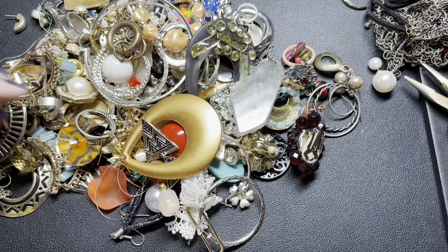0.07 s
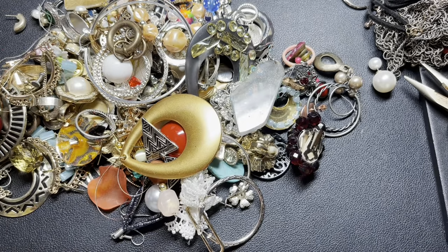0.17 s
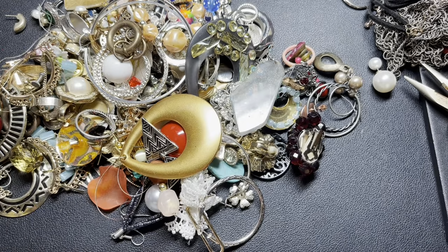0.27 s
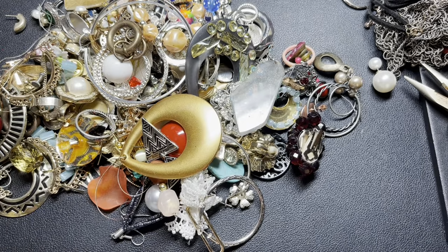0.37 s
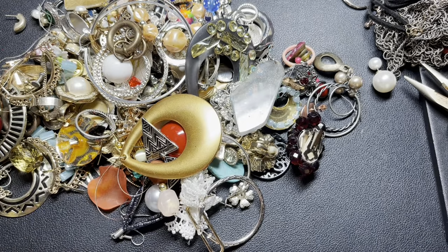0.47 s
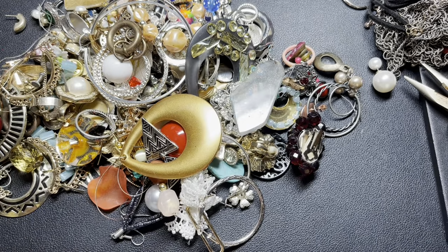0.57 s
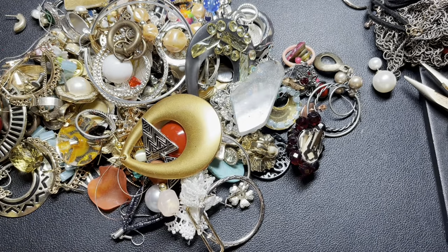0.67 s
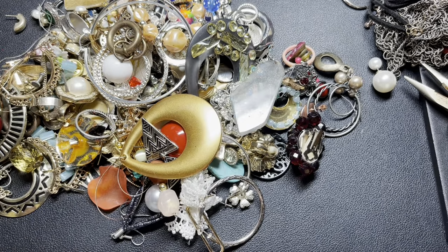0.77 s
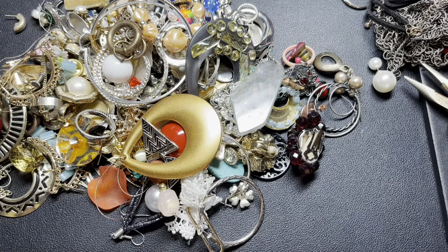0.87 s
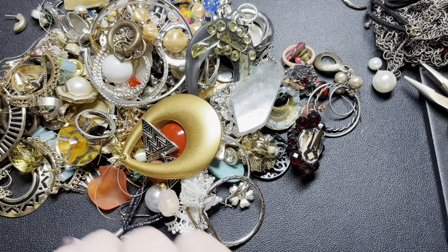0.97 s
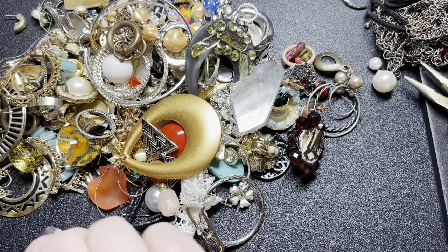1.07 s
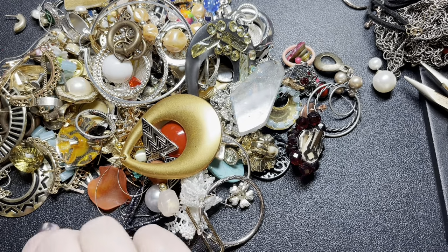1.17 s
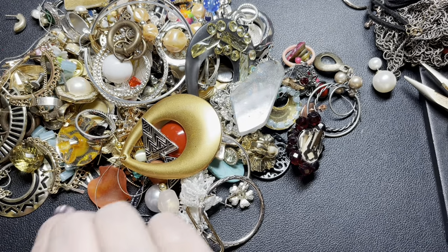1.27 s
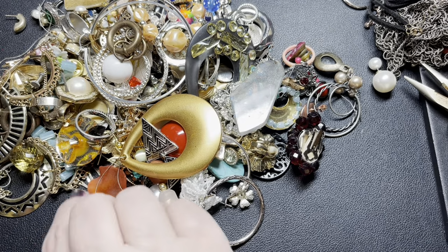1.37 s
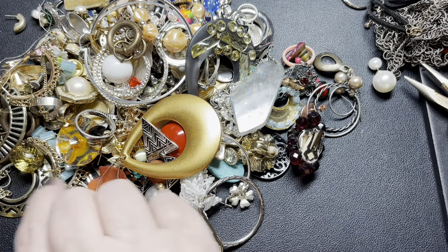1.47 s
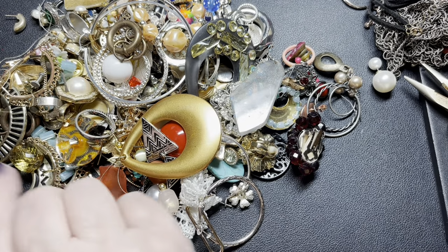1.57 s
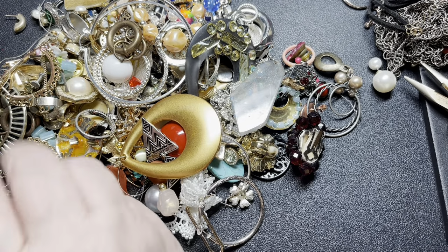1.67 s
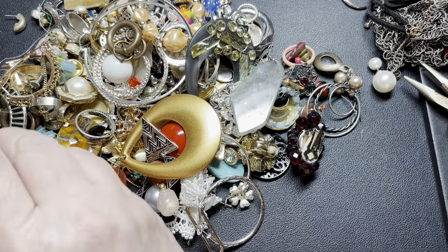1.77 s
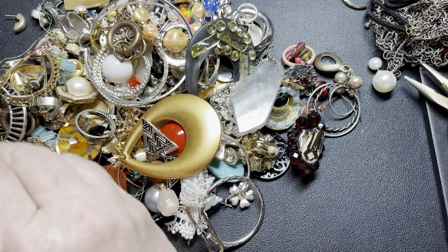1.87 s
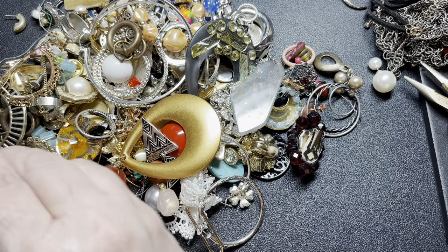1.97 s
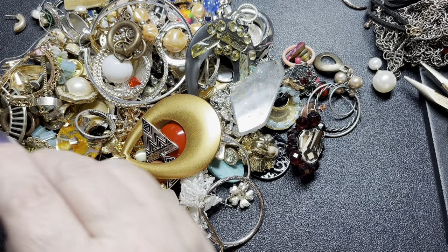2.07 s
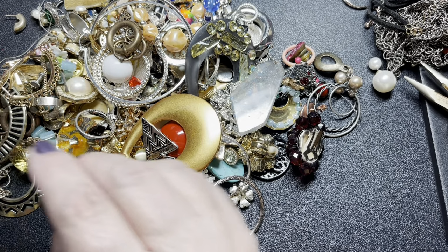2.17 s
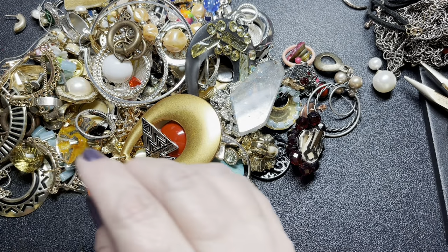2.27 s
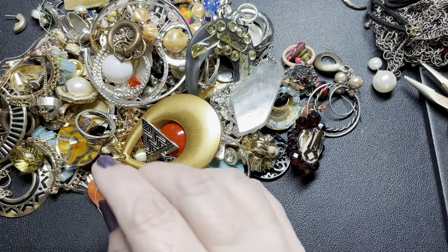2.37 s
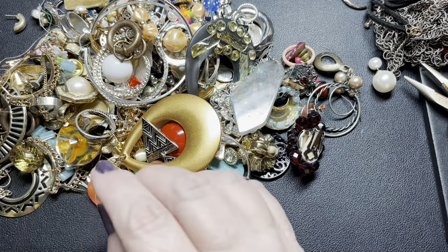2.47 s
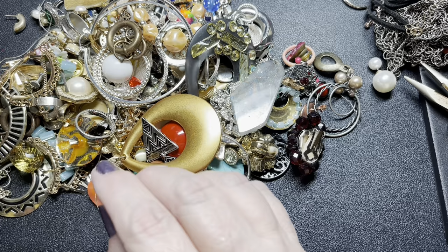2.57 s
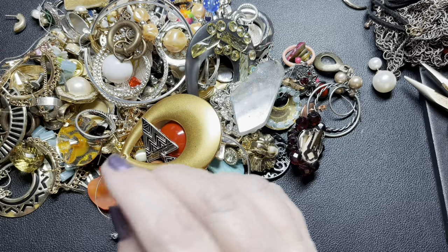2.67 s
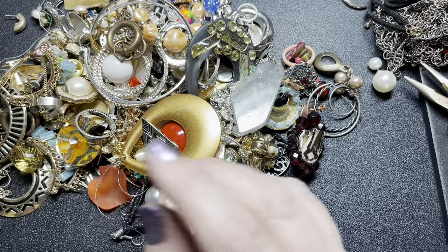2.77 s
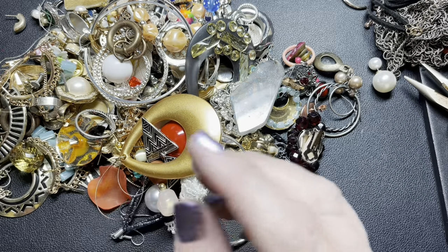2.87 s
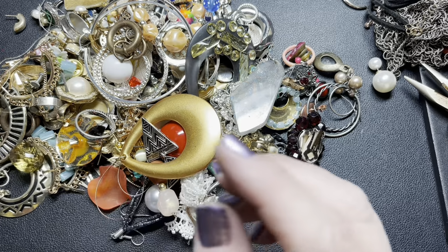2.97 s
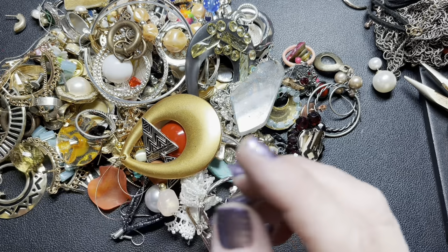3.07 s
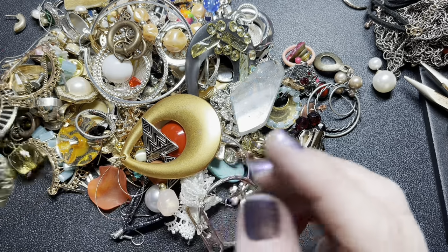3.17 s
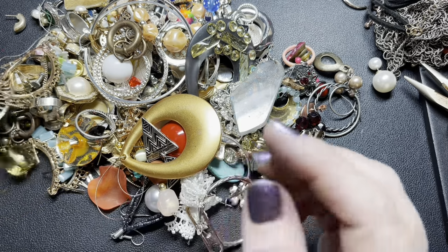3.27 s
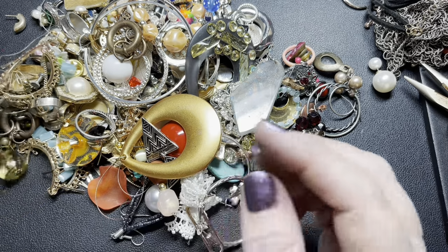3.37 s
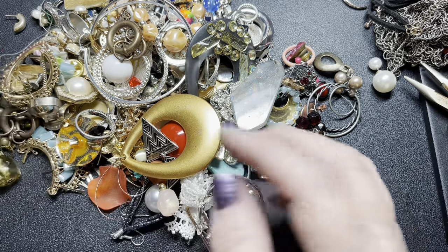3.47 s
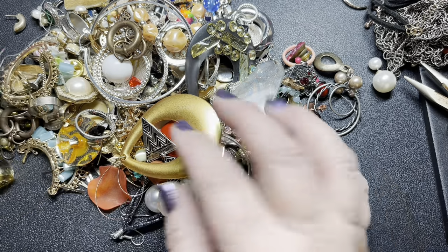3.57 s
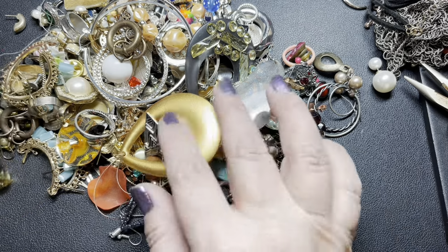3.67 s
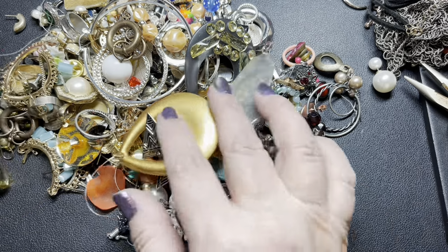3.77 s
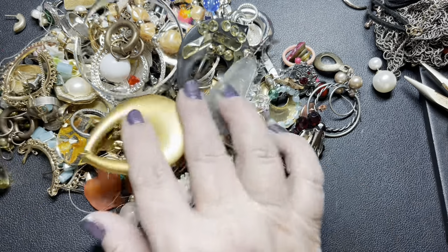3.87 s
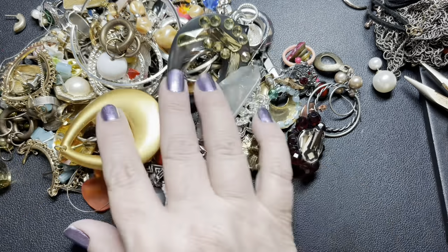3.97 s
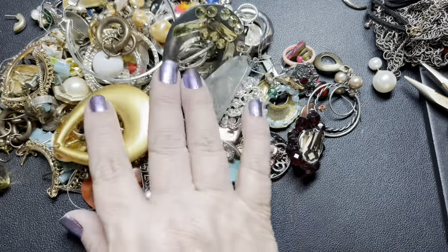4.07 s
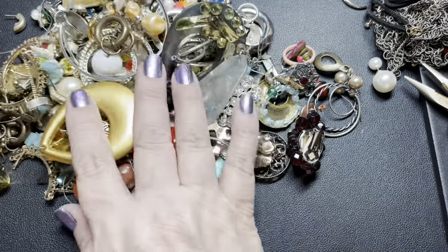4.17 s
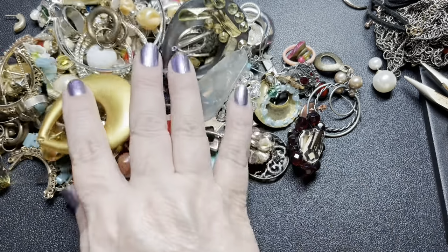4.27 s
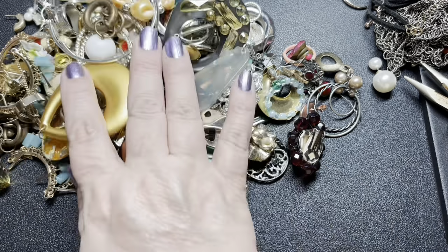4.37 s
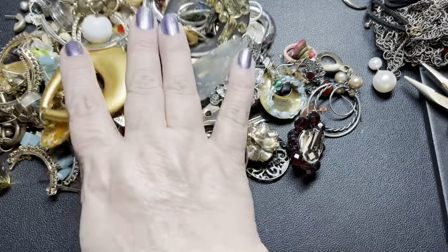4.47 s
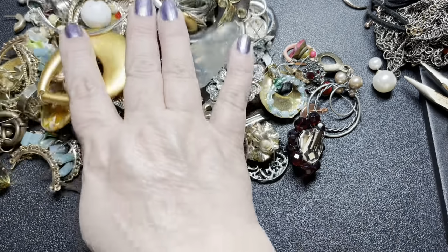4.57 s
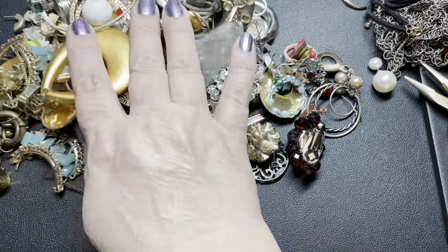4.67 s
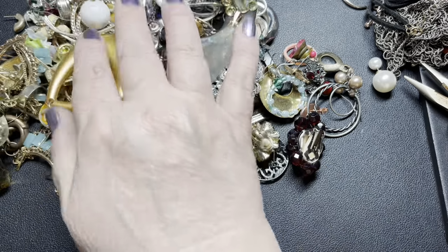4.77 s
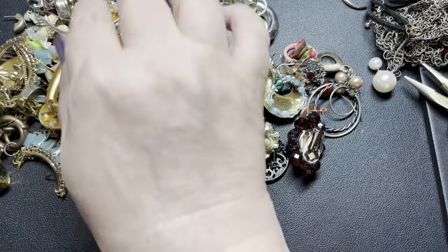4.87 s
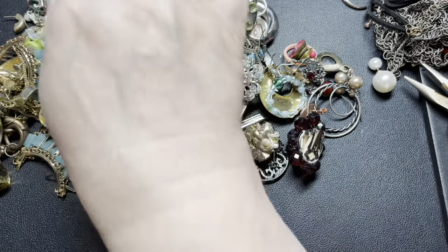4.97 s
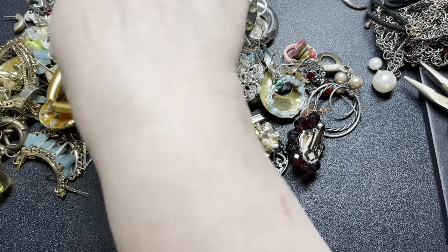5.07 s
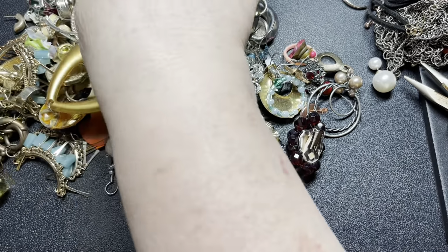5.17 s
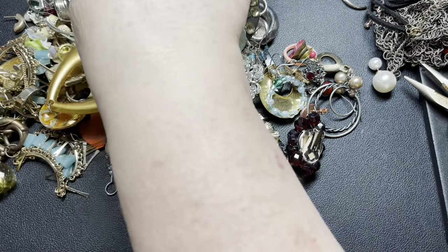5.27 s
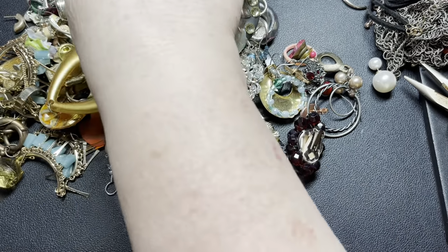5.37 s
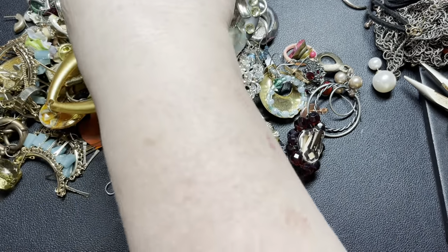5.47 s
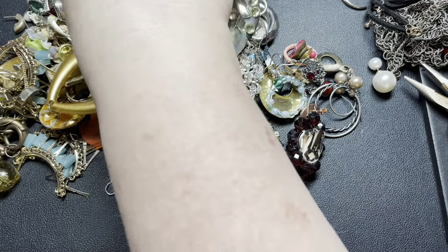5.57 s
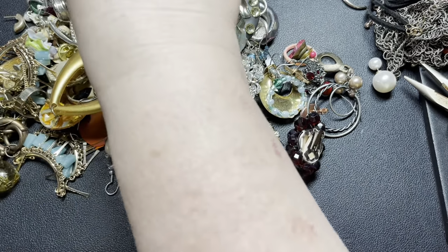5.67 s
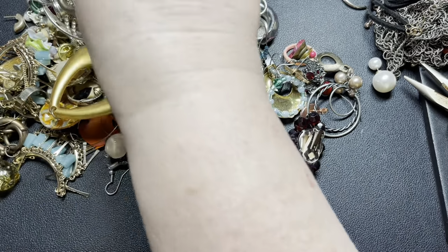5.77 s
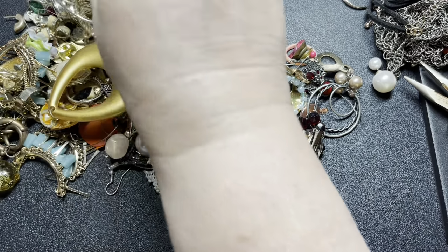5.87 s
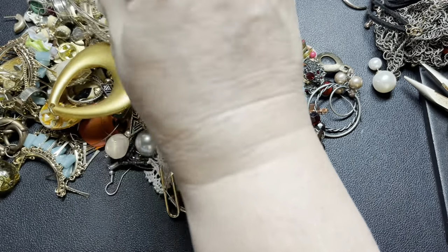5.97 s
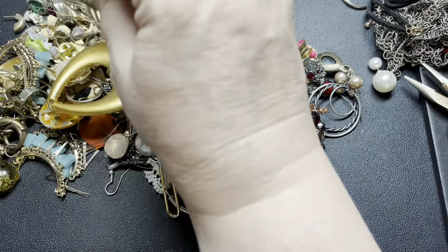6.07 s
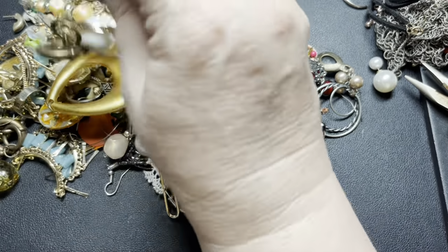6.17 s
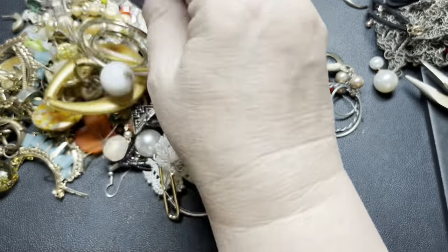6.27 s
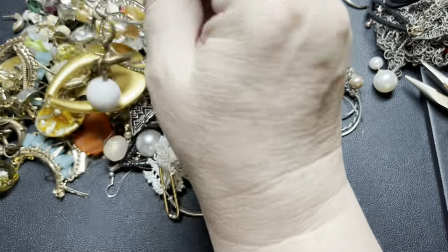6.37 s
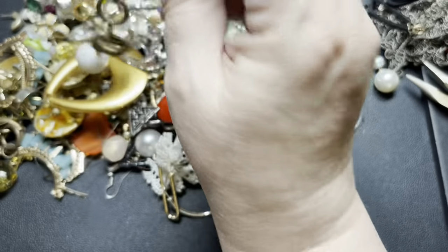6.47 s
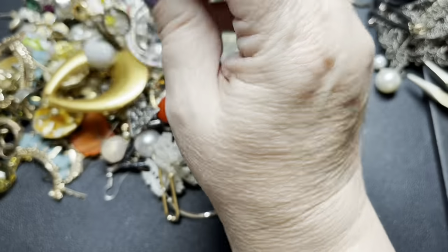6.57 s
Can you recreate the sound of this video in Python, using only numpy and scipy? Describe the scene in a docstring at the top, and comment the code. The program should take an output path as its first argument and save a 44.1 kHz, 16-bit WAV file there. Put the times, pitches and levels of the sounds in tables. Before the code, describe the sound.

A small, quiet room with a steady low rumble and thin hiss, heard by a very close stereo microphone. At about 0.2 s a soft dull bump thuds in the table. Single small metal clicks follow around 0.75 and 0.95 s, with a faint skin brush near 1.4 s, then near quiet. Two duller clinks tap at 2.3-2.4 s. From 2.9 to 3.4 s small bright ticks and brief skids begin. From 3.55 to 4.6 s the hand ploughs through the heap: fine chains jingle densely, larger trinkets clatter and scrape, with dead knocks from the padded top, strongest around 3.8 and 4.1-4.3 s. From 4.7 to 5.9 s it thins to light rustling and scattered clinks, with a short skid near 5.05 s. At 6.0 s comes the loudest, brightest clash; further clanks at 6.25 and 6.36 s set a bangle briefly ringing, and small clinks continue until about 6.6 s.

```python
"""Over a steady low rumble and thin hiss come a dull bump and a few single clicks, close to a two-port microphone.
A hand then pushes into a heap of metal costume jewelry on a padded table: chains jingle, trinkets clatter
and scrape, and a bangle rings as a handful is lifted. The room is small and quiet.
Struck pieces are sums of damped modes with a noise crack; chains are dense random contacts between such pieces;
rumble, hiss, table and skin are coloured noise; the bangle is a set of fading sines."""
import sys
import numpy as np
from scipy import signal
from scipy.fft import rfft, irfft, next_fast_len
from scipy.io import wavfile
from scipy.ndimage import map_coordinates

SR = 44100
rng = np.random.default_rng(int(sys.argv[2]) if len(sys.argv) > 2 else 0)


def persist_wave(psi):
    """Save psi, clipped to +-1, as 16-bit WAV."""
    counts = np.round(np.clip(psi, -1, 1) * 32767).astype(np.int16)
    wavfile.write(sys.argv[1], SR, np.atleast_2d(counts).T)


N = 292383


def amp(db):
    """Decibels to gain."""
    return 10 ** (np.asarray(db) / 20)


def unit(x):
    """Scale to rms 1."""
    return x / np.sqrt(np.mean(x ** 2) + 1e-20)


def signed(*shape):
    """Random values spread evenly from -1 to 1."""
    return rng.uniform(-1, 1, shape)


def along(points, hz):
    """Read (Hz, value) points on a log frequency axis."""
    point_hz, value = np.transpose(points)
    return np.interp(np.log(hz + 1), np.log(point_hz), value)


def add(track, s, sound):
    """Mix a sound into a track at time s."""
    rest = track[..., max(round(s * SR), 0):]
    rest[..., :sound.shape[-1]] += sound[..., :rest.shape[-1]]


def colour(x, *spectra, size=2048):
    """Causal (minimum-phase) filter whose dB gain is the sum of the spectra."""
    hz = np.fft.rfftfreq(size, 1 / SR)
    gain_db = sum(along(points, hz) for points in spectra)
    cepstrum = irfft(np.log(amp(gain_db)))
    # folding the cepstrum forward in time makes the phase minimal
    cepstrum[1:size // 2] *= 2
    cepstrum[size // 2 + 1:] = 0
    response = np.array(irfft(np.exp(rfft(cepstrum))), ndmin=x.ndim)
    return signal.oaconvolve(x, response, axes=-1)[..., :x.shape[-1]]


def fade(t, t60):
    """Exponential decay, 60 dB in t60 seconds."""
    return np.exp(-np.log(1000) * t / t60)


def wobble(rate):
    """A random curve: straight lines between rate knots a second."""
    knots = rng.standard_normal(int(N * rate / SR) + 4)
    return map_coordinates(knots, [np.arange(N) * rate / SR], order=1)


def swells(rows, attack_s, release_s):
    """Gain per sample: each gesture rises to full at its time, holds and dies away."""
    t = np.arange(N) / SR
    gain = np.zeros(N)
    for full_s, hold_s, level_db in rows:
        rise = np.minimum((t - full_s) / attack_s, 0)
        fall = np.minimum((full_s + hold_s - t) / release_s, 0)
        gain += amp(level_db) * np.exp(rise + fall)
    return gain


# how much the two ports differ, side against mid: pitch_hz [Hz], gain_db [dB]
SIDE_SPREAD = [(100, -22.5), (250, -9.5), (550, -0.5), (1000, -2), (1600, -29), (3000, -13.5), (5000, -8),
               (9000, -40), (11500, -7.5), (14500, -27.5)]


def scatter(side):
    """Tint a side signal so that some bands spread wide and others stay nearly mono."""
    return colour(side, SIDE_SPREAD)


# tint of the room's rumble and hiss: pitch_hz [Hz], gain_db [dB]
RUMBLE_COLOUR = [(20, -15), (35, 4.5), (70, 3.5), (115, 2.5), (170, -6), (250, -6.5), (400, -23),
                 (700, -31), (1500, -36.5), (4000, -37.5), (7500, -38.5), (10400, -28), (12000, -46.5),
                 (13200, -53), (14500, -82)]


def background(level_db=-59, side_db=-3):
    """Steady low room rumble and thin hiss, as mid and side; the bass is nearly mono."""
    mid = unit(colour(rng.standard_normal(N), RUMBLE_COLOUR, size=8192))
    side = scatter(unit(colour(rng.standard_normal(N), RUMBLE_COLOUR, size=8192)))
    return amp(level_db) * np.array([mid, amp(side_db) * side])


# how long each band of the room lingers: pitch_hz [Hz], t60_s [s to fall 60 dB]
ROOM_DECAY = [(200, .22), (600, .2), (2000, .24), (6000, .24), (14000, .15)]


def room(x, mid_db=-19, side_db=-25):
    """A short diffuse tail of fading noise, as mid and side; the top treble dies first."""
    hz, t, noise = signal.stft(rng.standard_normal((2, SR // 2)), SR, nperseg=256)
    decay = fade(t, along(ROOM_DECAY, hz)[:, None])
    tail = signal.istft(noise * decay, SR)[1]
    wet = signal.fftconvolve(x[None], tail / np.linalg.norm(tail[0]), axes=1)[:, :N]
    return wet * amp([[mid_db], [side_db]])


# dull knocks on the table: start_s [s], level_db [dB, relative], t60_s [s, decay of the push]
BUMP_HITS = [(0.223, -38, 0.37), (0.239, -39.5, 0.078), (6.037, -45, 0.051)]
# tint of the table top under a soft bump: pitch_hz [Hz], gain_db [dB]
TABLE_COLOUR = [(30, -37), (90, 1.5), (160, 6.5), (230, -0.5), (450, -21.5), (760, -12.5), (1200, -27),
                (1800, -27), (2700, -36), (3600, -76), (15000, -60)]


def bumps(level_db=-17):
    """Soft, heavy contacts thud in the table top: fading noise through its dull tint."""
    out, t = np.zeros(N), np.arange(SR // 2) / SR
    for start_s, bump_db, t60_s in BUMP_HITS:
        push = rng.standard_normal(len(t)) * fade(t, t60_s)
        add(out, start_s, amp(bump_db + level_db) * unit(colour(push, TABLE_COLOUR)))
    return out


# soft hiss: skin sliding lightly, and faint tails after the two clinks near 2.4 s:
# full_s [s], hold_s [s], level_db [dB]
SOFT_HISSES = [(.745, .04, -66.5), (.98, 0.0093, -65), (1.4, 0.06, -56.5), (2.0, 0.075, -73),
               (2.33, .01, -65), (2.42, 0.0092, -69)]
# tint of the soft hiss: pitch_hz [Hz], gain_db [dB]
HISS_COLOUR = [(100, -6), (600, -10), (1500, 0), (3200, -2), (4100, 6.5), (6000, 4), (8500, 8.5),
               (10600, 13), (12000, -18), (15000, -27)]
HISS_ATTACK_S, HISS_RELEASE_S = 0.0095, 0.042  # time constants


def brush():
    """Soft swells of coloured noise: the hand slides in with a faint hiss, and two clinks get faint tails."""
    hiss = unit(colour(rng.standard_normal(N), HISS_COLOUR))
    return swells(SOFT_HISSES, HISS_ATTACK_S, HISS_RELEASE_S) * hiss


# a piece is pressed down onto the table top: start_s [s], level_db [dB, relative]
KNOCK_HITS = [(0.982, -48), (2.3194, -47.5), (2.402, -41.5), (2.4161, -39.5), (2.7286, -40.5), (3.78, -41),
              (3.8431, -42), (4.1003, -39), (4.4066, -29.5), (4.6683, -44), (4.8254, -35.5), (5.018, -46.5),
              (5.195, -43.5), (5.4276, -47.5), (6.0121, -31), (6.0427, -33), (6.2484, -40.5),
              (6.3657, -41.5)]
# tint of the padded top under a pressed piece: pitch_hz [Hz], gain_db [dB]
PADDED_TOP_COLOUR = [(30, -17), (130, 16), (280, 13), (460, 9), (750, 12), (1200, 0.5), (2300, -14),
                     (5000, -29)]


def knocks(level_db=19, t60=0.079, size=4096):
    """The padded top answers a pressed piece with a short, dead knock of fading noise."""
    out = np.zeros(N)
    for start_s, knock_db in KNOCK_HITS:
        push = rng.standard_normal(size) * fade(np.arange(size) / SR, t60)
        add(out, start_s, amp(knock_db + level_db) * push / np.linalg.norm(push))
    return colour(out, PADDED_TOP_COLOUR)


def trinket(ring_t60, crack_db, crack_t60, count=40, size=2048):
    """One damped piece struck once, as mid and side: a crack and inharmonic modes that each radiate their own way."""
    t = np.arange(size) / SR
    slots = np.arange(count) + rng.random(count)
    hz = 1200 + 14000 * slots[:, None] / count  # one mode at random in each slot
    life, strength = signed(2, count, 1)
    phase = rng.random((2, count, 1))  # in cycles, separate for mid and side
    modes = amp(4.9 * strength) * fade(t, ring_t60 * 2 ** life) * np.sin(2 * np.pi * (hz * t + phase))
    ring = unit(modes.sum(axis=1))
    crack = unit(rng.standard_normal((2, size)) * fade(t, crack_t60))
    return unit(ring + amp(crack_db) * crack) / np.sqrt(size)


def jostle(rate, ring_t60, spread_db, voice_db=10, count=20):
    """Random contacts, rate a second, rms 1: each piece has its own voice and chatters in short bouts."""
    grains = np.zeros((2, N))
    bands = np.linspace(600, 15000, 15)
    shoves = np.exp(.6 * wobble(60))  # the whole heap sticks and gives way
    for _ in range(count):
        voice = list(zip(bands, voice_db * signed(len(bands))))
        piece = unit(colour(trinket(ring_t60, crack_db=-2.0, crack_t60=0.0064), voice))
        bouts = unit(shoves * np.exp(wobble(25)))
        struck = np.flatnonzero(rng.random(N) < 2 * rate * bouts / count / SR)
        strength, direction = signed(2, N)[:, struck]
        blows = np.zeros(N)
        blows[struck] = amp(spread_db * strength) * np.sign(direction)
        grains += signal.oaconvolve(blows[None], piece, axes=1)[:, :N]
    return unit(grains / np.sqrt(rate))


# a small piece skids over its neighbours: start_s [s], length_s [s], level_db [dB]
SKID_MOVES = [(0.758, 0.079, -61), (2.423, 0.094, -74), (2.73, 0.068, -64), (2.906, 0.054, -41.5),
              (3.039, 0.054, -41.5), (5.036, 0.038, -30)]
# the skidding piece's broad resonance: pitch_hz [Hz], gain_db [dB]
SKID_COLOUR = [(300, -22), (2000, -31), (3300, -11), (3900, 4), (4600, 3.5), (5500, -4.5), (8000, -29),
               (10500, -5.5), (14000, -23)]


def skids(slip_rate=1100):
    """Fast stick-slip ticks through one piece's broad resonance, swelling and fading with each push."""
    push = np.zeros(N)
    for start_s, length_s, level_db in SKID_MOVES:
        arch = np.sin(np.linspace(0, np.pi, round(length_s * SR)))
        add(push, start_s, amp(level_db) * arch)
    slips = jostle(slip_rate, ring_t60=.01, spread_db=6, count=5)
    return push * unit(colour(slips, SKID_COLOUR))


# the bangle's modes: pitch_hz [Hz], level_db [dB, relative], t60_s [s to fall 60 dB]
BANGLE_MODES = [(2830, -9, .3), (5157, 0, .34), (6977, -4, .13), (9868, -6, .12), (10590, -7, .2),
                (11940, -6, .18)]
# touches that set the bangle ringing: start_s [s], level_db [dB, relative]
BANGLE_TOUCHES = [(6.056, -57), (6.12, -40.5), (6.221, -33), (6.247, -44.5), (6.359, -37)]


def bangle(level_db=-2, rub=0.65):
    """Lifted clear of the heap, a bangle rings on after each touch; its neighbours rub and unsteady the tone."""
    out, t = np.zeros(N), np.arange(SR // 2) / SR
    knots = t[::400]
    for start_s, touch_db in BANGLE_TOUCHES:
        for pitch_hz, mode_db, t60_s in BANGLE_MODES:
            strength = amp(touch_db + mode_db + level_db + 2 * rng.standard_normal())
            drift = rub * np.interp(t, knots, rng.standard_normal(len(knots)))  # phase, radians
            tone = np.sin(2 * np.pi * pitch_hz * t + drift)
            add(out, start_s, strength * fade(t, t60_s) * tone)
    return out


# the flat hand ploughs through the heap: time_s [s], push_db [dB, effort], drag_db [dB, on the larger pieces]
PLOUGH_PATH = [(3.42, -75, -66), (3.57, -52, -54), (3.61, -33.5, -44.5), (3.78, -31.5, -39.5),
               (3.88, -39, -47), (3.94, -37.5, -43.5), (4.19, -32.5, -42.5), (4.27, -27, -38.5),
               (4.42, -30.5, -41), (4.48, -39, -49), (4.58, -40.5, -46), (4.68, -57, -67)]
# the fingers nudge the heap: full_s [s], hold_s [s], push_db [dB, effort]
FINGER_NUDGES = [(2.92, 0.052, -46), (3.19, 0.057, -58.5), (4.83, .02, -47.5), (4.93, .02, -45.5),
                 (5.04, 0.029, -34.5), (5.2, 0.013, -40.5), (5.4, 0.075, -45), (5.59, 0.11, -41),
                 (5.885, .01, -45), (5.94, .06, -43.5), (6.02, 0.031, -27), (6.23, 0.011, -32.5),
                 (6.37, 0.033, -36), (6.575, 0.034, -44.5)]
NUDGE_ATTACK_S, SETTLE_S = 0.019, 0.032  # time constants of the heap giving way and settling
TOUCH_S, REST_DB = 2.73, -56  # from then on the hand lies on the heap and keeps it faintly astir


def effort(restless_db=3, scrape_db=-8, scrape_grows=1.284):
    """The hand's push on the fine links and its drag on the larger pieces, which a light touch hardly moves."""
    t = np.arange(N) / SR
    time_s, *levels = np.transpose(PLOUGH_PATH)
    # silent before and after the path
    plough, drag = [amp(np.interp(t, time_s, db, -np.inf, -np.inf)) for db in levels]
    resting = (t > TOUCH_S) * amp(REST_DB + restless_db * wobble(14))
    stir = resting + swells(FINGER_NUDGES, NUDGE_ATTACK_S, SETTLE_S)
    stir_drag = amp(scrape_db) * stir.max() * (stir / stir.max()) ** scrape_grows
    return plough + stir, drag + stir_drag


# tint of the fine links: pitch_hz [Hz], gain_db [dB]
CHAIN_COLOUR = [(100, -35), (1500, -51), (3200, -11), (4200, 3), (5400, 4.5), (7000, 5.5), (8600, 8.5),
                (10500, 11), (11600, 0.5), (12700, -1.5), (14000, -28), (15500, -13)]
# tint of the larger pieces scraping: pitch_hz [Hz], gain_db [dB]
SCRAPE_COLOUR = [(30, -10), (140, 5), (300, -3.5), (480, -5), (800, -0.5), (1250, -7.5), (1570, -2),
                 (2000, -4), (2500, -1), (3500, -3), (6000, -8.5), (14000, -29)]


def heap(push, drag, rest_rate=150, extra_rate=1000, chains_db=-1, scrape_db=-1.5):
    """Fine links jingle and larger pieces scrape; the harder the push, the louder and the more contacts each second."""
    rate = abs(rest_rate + extra_rate * np.sqrt(push / push.max()))
    links = jostle(rate, ring_t60=0.033, spread_db=16, voice_db=13.5, count=28)
    pieces = jostle(rate / 2, ring_t60=0.034, spread_db=3.5, voice_db=12, count=24)
    jingle = amp(chains_db) * push * unit(colour(links, CHAIN_COLOUR))
    # the links also tap on the larger pieces
    scrape = amp(scrape_db) * drag * unit(colour(pieces + .5 * links, SCRAPE_COLOUR))
    return jingle + scrape


GRAZE_S = .006  # a piece may graze its neighbours this long before it lands


def chatter(rebound, clatter_s, graze, count=7, size=4096):
    """Light grazes, the blow itself, then weaker rebounds, mostly within a few milliseconds."""
    late, early = rng.exponential(1, count), rng.random(count)
    s = np.concatenate([GRAZE_S * early, GRAZE_S + clatter_s * late])
    strength = np.concatenate([graze * early, rebound * np.exp(-late / 2)])
    blows = np.zeros(size)
    blows[np.clip(s * SR, 0, size - 1).astype(int)] = strength * np.sign(signed(len(s)))
    blows[round(GRAZE_S * SR)] = 1
    return blows


# pieces striking each other, small ones bright and large ones dull:
# hit_s [s], level_db [dB, relative], brightness [dB per octave]
CLINK_HITS = [(0.7419, -42, -0.5), (0.926, -49, -3), (0.9798, -34, -1), (1.2718, -60, -7.5),
              (1.328, -54.5, -2.5), (1.338, -57.5, -1), (2.3192, -43, -6), (2.3995, -36.5, -7),
              (2.414, -41, -13.5), (2.7281, -47, -1), (2.9945, -44, -2), (3.0064, -36.5, 1.5),
              (3.04, -36.5, 0), (3.064, -39.5, -3), (3.0783, -34, 1.5), (3.094, -37, 1.5),
              (3.127, -42, 4.5), (3.1903, -43, 7.5), (3.3142, -44, 12.5), (3.3637, -43.5, 7),
              (3.3892, -44, 8.5), (3.4167, -39.5, -3), (3.5294, -36, -7.5), (3.5814, -34, 12),
              (3.598, -32.5, 1), (3.6207, -28, -11.5), (3.6446, -25, -9), (3.69, -28, -6.5),
              (3.7381, -30.5, -9.5), (3.762, -22, -9.5), (3.78, -19.5, -7), (3.8433, -22, -5),
              (4.1006, -26, -3), (4.1236, -17, -2.5), (4.2317, -20, 1.5), (4.2607, -21, -3),
              (4.3032, -24.5, -4), (4.334, -28, -2), (4.3787, -28, -7), (4.4065, -27, -10),
              (4.4879, -45, 5), (4.511, -31, 0.5), (4.5722, -30, -5.5), (4.6679, -35, -6.5),
              (4.7461, -43, 0), (4.8249, -33.5, -4.5), (5.0485, -34, -2.5), (5.1377, -39, -3),
              (5.1925, -30, 4.5), (5.1983, -31, 9), (5.2825, -27.5, -1), (5.397, -35.5, -1.5),
              (5.4288, -38.5, 7.5), (5.592, -36.5, -2.5), (5.7048, -31.5, -3), (5.8022, -36, -6),
              (5.857, -40, 8), (5.915, -34, 1), (5.941, -32, 0), (5.963, -32.5, 12), (6.0126, -11.5, 2.5),
              (6.038, -12.5, -0.5), (6.0441, -13, 7), (6.056, -17.5, 5.5), (6.0959, -24.5, 0),
              (6.122, -23, 3), (6.2479, -16, 3.5), (6.3598, -23, 5.5), (6.3659, -21, 0), (6.4125, -31, 6),
              (6.4238, -23.5, 4.5), (6.4932, -28, 0), (6.535, -29, 0.5), (6.5629, -24, 2),
              (6.577, -23, 2.5)]
# tint shared by all struck pieces: pitch_hz [Hz], gain_db [dB]
STRUCK_COLOUR = [(30, 3), (130, 13.5), (280, 10), (460, 5), (750, 6), (1200, 2.5), (2300, -5.5),
                 (4200, 0.5), (6500, 4), (8700, 5), (10300, 11), (12200, -5.5), (13800, -15), (15500, -21)]
CLINK_HZ, CLINK_PEAK_DB = 5820, 1  # the pivot of the brightness tilt, and its lift
BODY_HZ, SHIMMER_HZ = 2296, 10800  # brightness tilts the range between these
BASS_HZ, BASS_DB = 493, -31  # struck pieces radiate little bass


def clinks(push, level_db=22, graze=0.26, rebound=0.81, rebound_drop=0.045):
    """Pieces strike and chatter, size tilting colour; large ones rebound more, a moving heap grazes them first."""
    out = np.zeros((2, N))
    for hit_s, hit_db, brightness in CLINK_HITS:
        body, shimmer = [(hz, brightness * np.log2(hz / CLINK_HZ)) for hz in (BODY_HZ, SHIMMER_HZ)]
        voice = [(BASS_HZ, BASS_DB), body, (CLINK_HZ, CLINK_PEAK_DB), shimmer]
        motion = np.sqrt(push[round(hit_s * SR)] / push.max())
        bounce = np.clip(rebound - rebound_drop * brightness, 0, 1)
        blows = chatter(bounce, clatter_s=.003, graze=graze * motion)
        piece = signal.fftconvolve(blows[None], trinket(ring_t60=0.048, crack_db=9, crack_t60=0.0065))
        piece *= amp(hit_db + level_db) / np.linalg.norm(piece[0])
        add(out, hit_s - GRAZE_S, colour(piece, STRUCK_COLOUR, voice))
    return out


def scene():
    """All sounds come from one spot on the table; the heap and the room spread them a little."""
    push, drag = effort()
    metal, metal_side = clinks(push) + heap(push, drag) + skids()
    direct = metal + bangle() + knocks() + bumps() + brush()
    close = np.array([direct, scatter(metal_side)])
    mid, side = room(direct) + background() + close
    return np.array([mid + side, mid - side])


# how far the left port leads the right one: pitch_hz [Hz], lead_rad [radians]
PORT_LEAD = [(20, 0), (1900, 0), (2750, .7), (3900, .65), (4600, 1.7), (5150, 4.7), (5900, 6.3),
             (8300, 8.9), (9500, 9.6), (12200, 12.4), (13800, 12.7), (15300, 15.5)]
TOP_HZ = 15900  # nothing passes from here up


def record(dry):
    """The two ports hear the table at different phases; the loudest peaks are rounded off; then the band limit."""
    size = next_fast_len(N + SR // 2)
    hz = np.fft.rfftfreq(size, 1 / SR)
    # half the lead goes to each port
    ports = np.exp(.5j * along(PORT_LEAD, hz) * np.array([[1], [-1]]))
    heard = irfft(rfft(dry, size) * ports, size)
    rounded = heard / (1 + (heard / .85) ** 4) ** .25
    return irfft(rfft(rounded) * (hz < TOP_HZ), size)[:, :N]


dry = scene()
out = record(dry)
persist_wave(out)
```